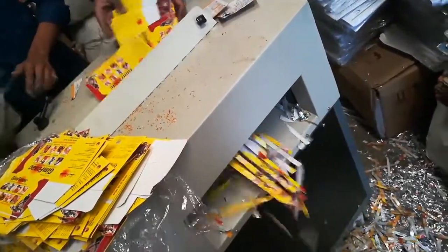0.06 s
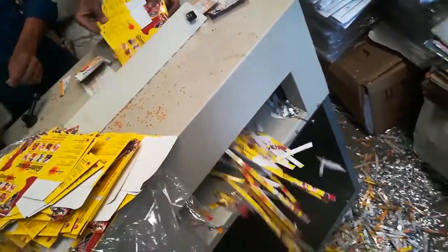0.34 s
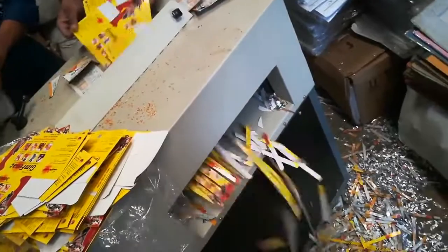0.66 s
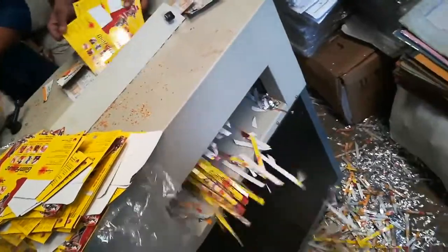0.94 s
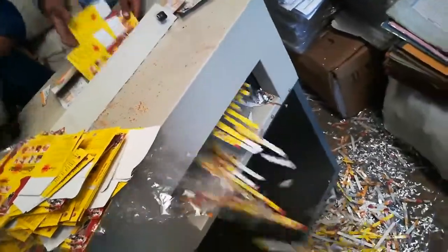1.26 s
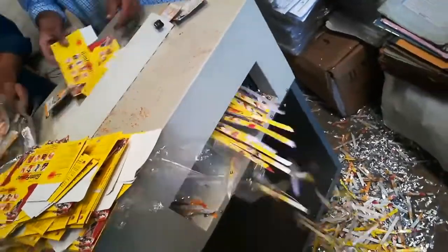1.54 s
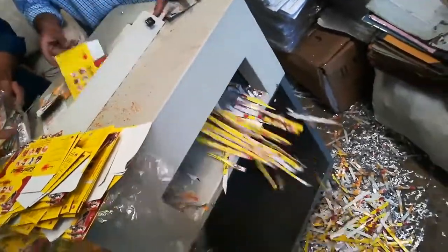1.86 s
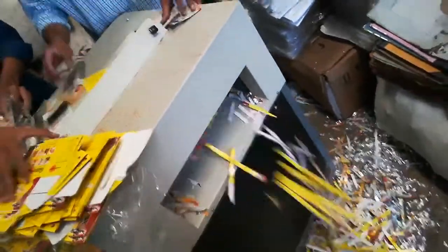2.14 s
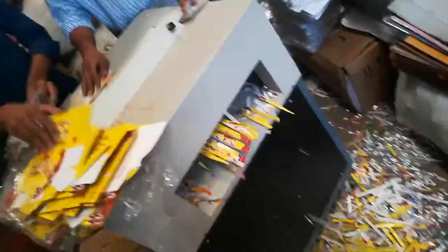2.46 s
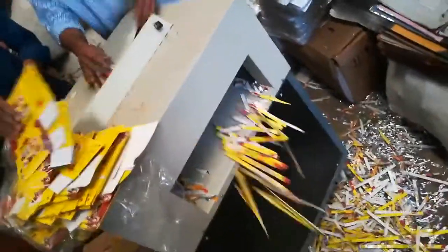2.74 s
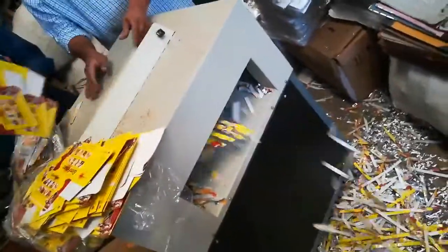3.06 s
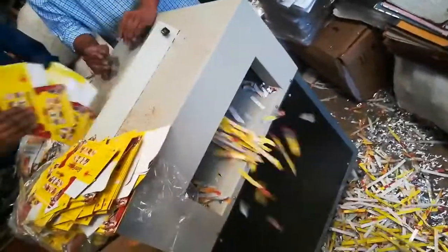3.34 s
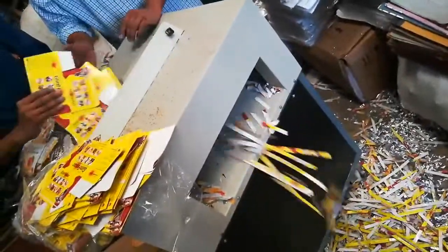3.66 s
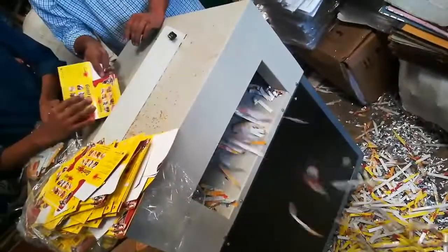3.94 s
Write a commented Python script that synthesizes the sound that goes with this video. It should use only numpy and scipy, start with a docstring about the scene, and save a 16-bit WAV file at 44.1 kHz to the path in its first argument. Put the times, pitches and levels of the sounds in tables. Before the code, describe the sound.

Close and to the right, a workshop shredder crunches cardboard with a bright metallic ringing and brief squeals. The motor hums, gears whine, the cabinet knocks softly and strips rustle; later, board crumples at the slot and the cutting lightens.

```python
"""In a workshop, close by and to the right, a strip shredder slits printed cartons.
Tearing board crackles through the steel cutter discs, which ring and squeal as the load comes and goes.
The board crumples at the feed slot, and squeaks and chirps where it slips on the discs.
Under it run the gear whine, the motor hum, the cabinet's rumble and knocks, and rustling strips."""
import sys
import numpy as np
from scipy import signal
from scipy.fft import rfft, irfft
from scipy.io import wavfile
from scipy.ndimage import uniform_filter1d

SR = 44100
rng = np.random.default_rng(int(sys.argv[2]) if len(sys.argv) > 2 else 0)


def file_out(sig):
    """Save sig as 16-bit WAV at sys.argv[1]."""
    # one column per channel
    cols = np.atleast_2d(sig).T
    # limit, then scale
    lim = np.clip(cols, -1, 1)
    pcm = np.round(lim * 32767).astype(np.int16)
    wavfile.write(sys.argv[1], SR, pcm)


N = 176400
T = np.arange(N) / SR
DISC_LEFT_DB = -12.5  # ringing and chirps are this much weaker on the left

# How hard the cutters work. Each row: time in seconds, relative level in dB.
LOAD = [(0, -29.5), (.14, -33.5), (.35, -31.5), (.73, -31), (.78, -34.5), (.85, -34), (.9, -31),
        (1.7, -32.5), (1.85, -30.5), (1.93, -33), (2.32, -33), (2.37, -34.5), (2.54, -35), (2.67, -38),
        (2.82, -33), (3.07, -33), (3.15, -32.5), (3.3, -33), (3.42, -34.5), (3.46, -37.5), (3.63, -37),
        (4, -39)]


def amp(db):
    """Turns decibels into a number to multiply by."""
    return 10 ** (np.asarray(db) / 20)


def left_gain(db):
    """Gains for left and right: the left changes by db, the right stays as it is."""
    return amp([[db], [0]])


def unit(x):
    """Scales x to an average strength (rms) of 1."""
    return x / np.sqrt(np.mean(x ** 2) + 1e-20)


def curve(rows, column=1):
    """Joins the points of a timed table with straight lines, giving a value for every sample."""
    rows = np.array(rows)
    return np.interp(T, rows[:, 0], rows[:, column])


def value_at(points, hz):
    """Looks up a table by frequency, with every octave equally wide."""
    f, value = np.transpose(points)
    return np.interp(np.log(hz + 1), np.log(np.sort(f)), value)


def colour(x, points):
    """Shapes the lows and highs of x by a table; sound below the first row fades away."""
    hz = np.fft.rfftfreq(N, 1 / SR)
    low_cut = np.minimum(hz / points[0][0], 1) ** 2
    return unit(irfft(rfft(x) * amp(value_at(points, hz)) * low_cut, N))


def wander(rate_hz, size=N):
    """A smooth random wobble, mostly slower than rate_hz."""
    f = np.fft.rfftfreq(4096, T[-1] / 4096)
    noise = rng.standard_normal(4096)
    slow = irfft(rfft(noise) * (f > 0) / (1 + (f / rate_hz) ** 4))
    return np.interp(T[:size], np.linspace(0, T[-1], len(slow)), unit(slow))


def stereo_noise(left_db, alike, size=N):
    """Hiss for left and right; alike runs from 0 (unrelated) to 1 (the same wave)."""
    right, other = rng.standard_normal((2, size))
    left = alike * right + np.sqrt(1 - alike * alike) * other
    return np.array([amp(left_db) * left, right])


def resonate(x, hz, width_hz):
    """Makes x ring in a narrow band around hz, which may be one pitch or a moving one."""
    r = np.exp(-np.pi * width_hz / SR)
    if np.ndim(hz) == 0:
        pole = r * np.exp(2j * np.pi * hz / SR)
        return unit(signal.lfilter([1], [1, -2 * pole, pole * pole], x).real)
    turn = np.exp(2j * np.pi * np.cumsum(hz) / SR)
    return unit((turn * signal.lfilter([1], [1, -2 * r, r * r], x / turn)).real)


def ring(x, modes):
    """Makes x ring at several modes, the pitches at which an object likes to shake."""
    f = np.fft.rfftfreq(N, 1 / SR)
    body = sum(amp(db) / np.sqrt(width) / (1 + 2j * (f - hz) / width) / (1 + .2j * (f - hz) / width)
               for hz, width, db in modes)
    return unit(irfft(rfft(x) * body, N))


def tone(hz, waver_hz, rough_db):
    """A held stereo tone that wavers around the pitch curve hz and trembles in level."""
    turns = np.cumsum(hz + waver_hz * wander(rate_hz=29, size=len(hz))) / SR
    wave = amp(rough_db * wander(rate_hz=26, size=len(hz))) * np.exp(2j * np.pi * turns)
    return np.array([unit(wave.imag), unit(wave.real)])


def add(mix, start, sound):
    """Mixes a sound in, start seconds from the beginning."""
    part = mix[:, max(round(start * SR), 0):][:, :sound.shape[1]]
    part += sound[:, :part.shape[1]]


def room(x, echo_db):
    """The workshop adds a short wash of echoes, different on each side."""
    # How long echoes last. Each row: frequency in Hz, seconds to fade by 60 dB.
    fade_times = [(250, 0.13), (4000, 0.089), (12000, 0.047)]
    hz, t, noise = signal.stft(rng.standard_normal((2, SR // 2)), SR, nperseg=256)
    fade = amp(-60 * t / value_at(fade_times, hz)[:, None])
    tail = signal.istft(noise * fade, SR, nperseg=256)[1]
    echoes = signal.fftconvolve(x, tail / np.linalg.norm(tail[0]), axes=1)[:, :N]
    return (x + amp(echo_db) * echoes) / np.sqrt(1 + amp(2 * echo_db))


def motor():
    """The motor hums and the cabinet rumbles."""
    # Modes of motor and cabinet. Each row: pitch in Hz, width in Hz, relative level in dB.
    hum_modes = [(122, 27, -12.5), (200.2, 12, 1), (292, 33, 2), (324.5, 12, -17), (349.2, 17, -0.5)]
    # The hum swells a little as the cutters empty. Each row: time in seconds, level in dB.
    hum_level = [(0, -57.5), (4, -56.5)]
    # Tone colour of the rumble. Each row: frequency in Hz, relative level in dB.
    rumble_colour = [(15, -11), (28, -14), (40, 0), (70, -2), (110, 4.5), (170, 2), (240, -5), (350, -0.5),
                     (470, -41), (900, -34)]
    hum = ring(stereo_noise(left_db=-0.5, alike=0.83), hum_modes)
    rumble = colour(stereo_noise(left_db=0.5, alike=1), rumble_colour)
    rumble_db = -58 + 1.3 * wander(rate_hz=8)
    return hum * amp(curve(hum_level)) + rumble * amp(rumble_db)


def knocks():
    """The cabinet panels give soft hollow knocks, with a little rattle."""
    # Each row is one knock: start in seconds, pitch in Hz, relative level in dB.
    hits = [(0.164, 320, -43), (0.979, 340, -48), (1.47, 113, -49)]
    rise_s, decay_s = .02, .07
    out, t = np.zeros((2, N)), T[:SR // 2]
    swell = np.minimum(t / rise_s, 1) * np.exp(-t / decay_s)
    for start, hz, db in hits:
        panel = resonate(stereo_noise(left_db=-0.5, alike=0.96, size=len(t)), hz, width_hz=40)
        rattle = resonate(stereo_noise(left_db=-5, alike=0.33, size=len(t)), hz=735, width_hz=240)
        add(out, start, (panel + rattle * amp(-3.5)) * amp(db) * swell)
    return out


def gears():
    """Gears and drive whine and sag a little under load; the gears have a rough overtone."""
    # The higher whine. Each row: time in seconds, pitch in Hz, relative level in dB.
    gear_whine = [(0, 1940, -53.5), (.64, 1920, -53), (.8, 1964, -55.5), (1.35, 1933, -60.5),
                  (1.5, 1914, -50), (2.3, 1954, -60.5), (2.5, 1958, -48), (2.65, 1960, -67),
                  (2.9, 1977, -52), (3.55, 1940, -63)]
    # The lower whine. Each row: time in seconds, pitch in Hz, relative level in dB.
    drive_whine = [(0, 1028, -59.5), (1.2, 1030, -64), (2.3, 1051, -65), (2.44, 1052, -55),
                   (2.6, 1052, -58), (3.1, 1051, -62.5), (3.6, 1051, -57.5), (4, 1038, -55)]
    gear_hz = curve(gear_whine)
    gear = tone(gear_hz, waver_hz=14, rough_db=1.2)
    overtone = resonate(stereo_noise(left_db=-8, alike=0), 2.07 * gear_hz, width_hz=72)
    gear = (gear + overtone * amp(-6)) * amp(curve(gear_whine, column=2))
    drive = tone(curve(drive_whine), waver_hz=12, rough_db=1.5) * amp(curve(drive_whine, column=2))
    return (gear + drive) * amp(3.5) * left_gain(-5)


def strips():
    """Strips rustle as they slide out and fall on the heap."""
    # Loudness of the rustle. Each row: time in seconds, relative level in dB.
    rustle_level = [(0.0, -55.5), (.4, -57), (.6, -57.5), (.85, -55), (3.45, -54), (4.0, -51)]
    # Its tone colour. Each row: frequency in Hz, relative level in dB.
    rustle_colour = [(250, -6.5), (480, -3), (800, 3.5), (1300, 2.5), (1700, 2), (2500, 4.5), (4000, 1.5),
                     (5500, 2), (8000, -17), (11000, -17), (15000, -45)]
    rustle = colour(stereo_noise(left_db=0.5, alike=0.032), rustle_colour)
    return rustle * amp(curve(rustle_level) + 8.5 + .5 * wander(rate_hz=27))


def crumple():
    """Cartons crumple as they are pushed into the feed slot."""
    # Loudness of the crumpling. Each row: time in seconds, average level in dB.
    crumple_level = [(.14, -56), (.19, -44.5), (.33, -46.5), (.5, -70), (2.35, -61), (2.62, -46),
                     (2.82, -45), (2.95, -53.5), (3.4, -59), (3.62, -44.5), (4, -61)]
    # Its tone colour. Each row: frequency in Hz, relative level in dB.
    crumple_colour = [(300, -6), (750, 1.5), (1400, 2), (2800, 2.5), (4300, 5.5), (5600, -11), (9000, -42)]
    noise = colour(stereo_noise(left_db=-0.5, alike=0.31), crumple_colour)
    return noise * amp(curve(crumple_level) + 1.6 * wander(rate_hz=57))


def squeak():
    """Coated board squeaks as it slips between the discs."""
    # Loudness of the squeak. Each row: time in seconds, level in dB.
    squeak_level = [(0, -51), (.1, -45), (.45, -42.5), (.63, -51.5), (.85, -43.5), (1.1, -49),
                    (1.48, -43.5), (1.7, -54), (3.22, -61.5), (3.32, -45), (3.42, -74)]
    # Its modes. Each row: pitch in Hz, width in Hz, relative level in dB.
    squeak_modes = [(3111, 18, 0.5), (3161, 36, 3.7), (3311, 34, 4.8)]
    return ring(stereo_noise(left_db=-5.5, alike=0.073), squeak_modes) * amp(curve(squeak_level))


def chirps():
    """Board catches on a disc and slips with a short ping that sometimes slides upward."""
    # Each row is one slip: start and length in seconds, pitch and its rise in Hz, right-side level in dB.
    slips = [(.74, .011, 6210, 0, -27), (1.819, .011, 6340, 0, -26), (1.83, .05, 7080, 200, -29),
             (1.927, .011, 6370, 0, -27), (2.699, .022, 6780, 650, -31), (2.814, .026, 5480, 0, -36),
             (3.356, .016, 6100, 0, -27), (3.675, .011, 6180, 0, -33), (3.863, .016, 6120, 0, -31)]
    out = np.zeros((2, N))
    for start, length, hz, glide_hz, db in slips:
        progress = T[:round(length * SR)] / length
        ping = tone(hz + glide_hz * progress, waver_hz=70, rough_db=3)
        swell = np.sin(np.pi * np.sqrt(progress))
        add(out, start, swell * ping * amp(db))
    return out * left_gain(DISC_LEFT_DB)


def squeals():
    """A rubbing disc locks onto one of its modes for a moment, in rough spurts."""
    # Each row is one rub: start and length in seconds, pitch in Hz, right-side level in dB.
    rubs = [(.52, .19, 7564, -35), (.875, .1, 7564, -31), (1.26, .3, 3590, -52), (1.21, .3, 4010, -49),
            (1.41, .19, 4800, -49), (1.61, .09, 4010, -45), (1.04, .29, 6010, -43), (1.3, .42, 10378, -51),
            (2.1, .24, 10378, -49), (2.19, .14, 6325, -36), (2.12, .16, 9240, -42), (2.79, .13, 8790, -42),
            (3.11, .25, 6008, -42), (3.28, .08, 3330, -50)]
    fade_s = .025
    out = np.zeros((2, N))
    for start, length, hz, db in rubs:
        t = T[:round(length * SR)]
        swell = np.clip(np.minimum(t, length - t) / fade_s, 0, 1)
        squeal = tone(np.full(len(t), hz), waver_hz=13, rough_db=3)
        add(out, start, swell * squeal * amp(db))
    return out * left_gain(-9)


def idle_hiss():
    """The cutters hiss softly when they run nearly empty."""
    # Tone colour of the hiss. Each row: frequency in Hz, relative level in dB.
    hiss_colour = [(1500, -35), (4200, -0.5), (5000, -12.5), (5750, 0.5), (6200, 4), (7100, 4.5), (8200, 2),
                   (9500, -5), (10800, -29), (15000, -55)]
    return colour(stereo_noise(left_db=-10, alike=0.087), hiss_colour) * amp(-38.5)


def fizz(tear):
    """Tearing fibres give off a fine, high fizz."""
    # Loudness of the fizz. Each row: time in seconds, relative level in dB.
    fizz_level = [(0, -50.5), (.8, -56), (1, -53.5), (1.6, -53.5), (2.3, -54.5), (2.65, -59.5), (3.05, -58),
                  (3.13, -45), (3.3, -49), (3.46, -64), (4, -70)]
    # Its tone colour. Each row: frequency in Hz, relative level in dB.
    fizz_colour = [(6000, -37), (9000, 9.5), (10900, -2), (13100, 2), (13700, -1), (14500, -26),
                   (15600, -23)]
    return colour(tear, fizz_colour) * amp(curve(fizz_level) + 4) * left_gain(3)


def disc_group(force, modes):
    """Steel discs ring at sharp pitches; rubbing against the board evens out their swing."""
    sharpness = 380  # a mode's pitch divided by its width
    out = 0
    for hz, db in modes:
        mode = resonate(force, hz, hz / sharpness)
        power = uniform_filter1d(mode ** 2, size=1024)
        out = out + amp(db) * unit(mode / (power + .05) ** .25)
    return unit(out)


def disc_ring(force):
    """The tearing force rings two groups of discs, a bright one and a lower one."""
    # Modes of the bright group. Each row: pitch in Hz, relative level in dB.
    bright_modes = [(6010, -53), (6336, -51), (6535, -50), (6675, -53), (6761, -46), (7564, -44),
                    (8059, -51), (8861, -55), (9135, -57), (9620, -54), (10379, -60), (11162, -62),
                    (11567, -65)]
    # Its loudness. Each row: time in seconds, relative level in dB.
    bright_level = [(0.0, -40), (2.8, -48.5), (3.11, -63), (4.0, -49)]
    # Modes of the lower group. Each row: pitch in Hz, relative level in dB.
    low_modes = [(6008, -51), (6324, -42), (6401, -49), (6487, -50), (6888, -49), (7273, -53), (8269, -54),
                 (9238, -49), (10376, -58)]
    # Fast-fading modes that join it. Each row: pitch in Hz, width in Hz, relative level in dB.
    damped_modes = [(6350, 90, 0), (8820, 90, -7), (9150, 110, -2.5)]
    # Loudness of those two together. Each row: time in seconds, relative level in dB.
    low_level = [(0, -40), (.2, -57), (.7, -35), (.8, -45), (1.1, -40), (1.42, -37.5), (1.7, -40.5),
                 (1.95, -36), (2.31, -29), (2.38, -40), (2.66, -39), (2.92, -37), (3.42, -35), (3.5, -65)]
    bright = disc_group(force, bright_modes) * amp(curve(bright_level) + 10)
    low = disc_group(force, low_modes) * amp(-1.5) + ring(force, damped_modes) * amp(-3.5)
    return (bright + low * amp(curve(low_level))) * left_gain(DISC_LEFT_DB)


def tearing():
    """Fibres snap in quick uneven bursts over a steady grinding."""
    snaps_per_s, spread_db, snap_decay_s = 700, 3, 0.00036
    grind_share = .8  # the steady part of the power
    snaps = (rng.random(N) < snaps_per_s / SR) * rng.choice([-1, 1], N)
    snaps = snaps * amp(spread_db * np.minimum(rng.exponential(1, N), 3))
    snap_fade = np.exp(-T[:256] / snap_decay_s)
    bursts = unit(np.sqrt(signal.lfilter(snap_fade, [1], snaps ** 2)))
    flutter = amp(wander(rate_hz=38))  # about 1 dB up and down
    strength = np.sqrt(grind_share + (1 - grind_share) * bursts ** 2) * flutter
    return unit(strength) * stereo_noise(left_db=-9.5, alike=0.078)


def cutters():
    """The tearing sounds through the steel as a broad crunch and rings the discs."""
    # Tone colour of the crunch. Each row: frequency in Hz, relative level in dB.
    crunch_colour = [(1500, -20.5), (3000, -17), (4100, -14), (5750, -11), (6100, -2), (6500, 5.5),
                     (7100, 0.5), (7900, -0.5), (8600, -5.5), (9200, -4.5), (9800, -12.5), (10300, -12),
                     (10800, -38), (15600, -45)]
    load_db = curve(LOAD)
    force = tearing()
    tear = unit(room(force, echo_db=-11))
    crunch = colour(tear, crunch_colour) * amp(load_db + 1.5) * left_gain(-3)
    bite = 1 / (1 + amp(-3 * (load_db + 36)))  # the discs fall quiet when little board is in them
    return bite * (crunch + disc_ring(force)) + fizz(tear) + idle_hiss() * np.sqrt(1 - bite)


def scene():
    """All the sounds of the shredder, added together."""
    blades = cutters() + chirps() + squeals() + squeak()
    return blades + gears() + motor() + strips() + crumple() + knocks()


def record(dry):
    """Cuts off the very highest treble."""
    cutoff_hz = 15700
    low_pass = signal.firwin(511, cutoff_hz, window=("kaiser", 9), fs=SR)
    return signal.oaconvolve(dry, low_pass[None], "same")


dry = scene()
out = record(dry)
file_out(out)
```